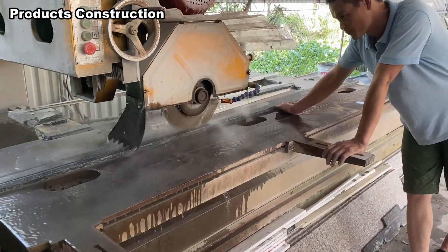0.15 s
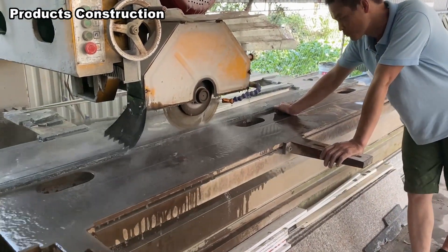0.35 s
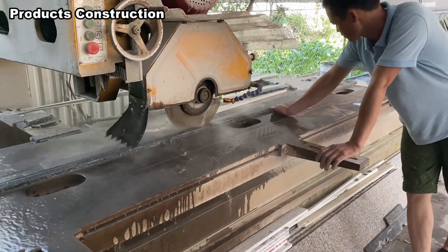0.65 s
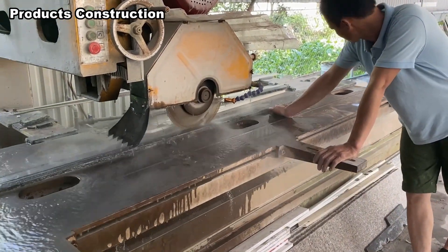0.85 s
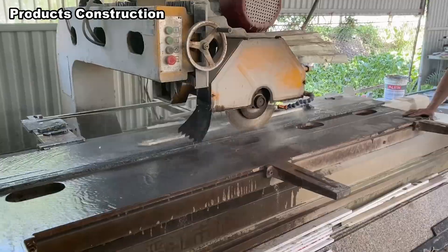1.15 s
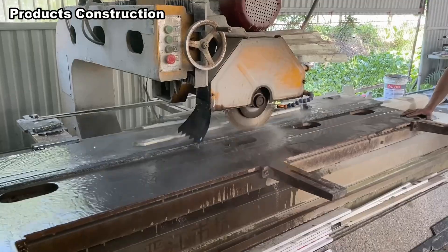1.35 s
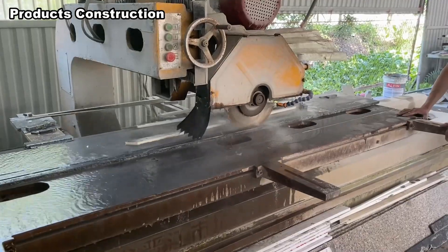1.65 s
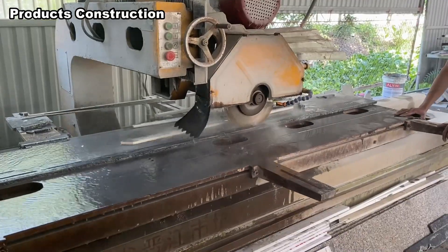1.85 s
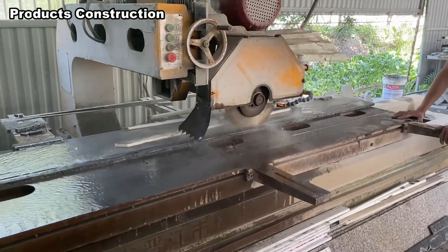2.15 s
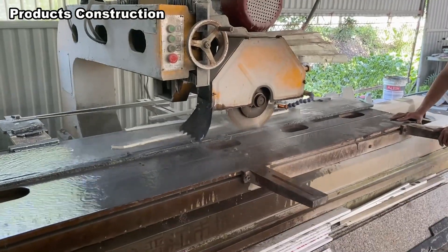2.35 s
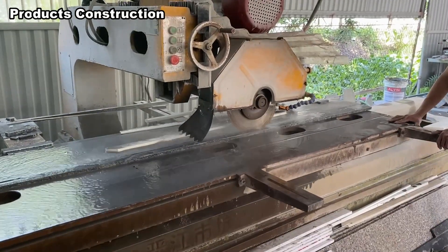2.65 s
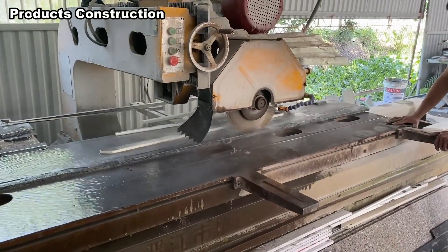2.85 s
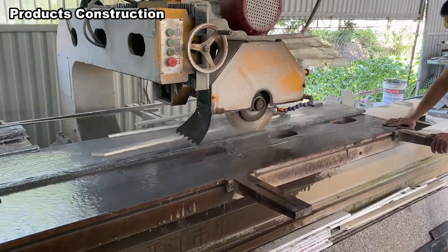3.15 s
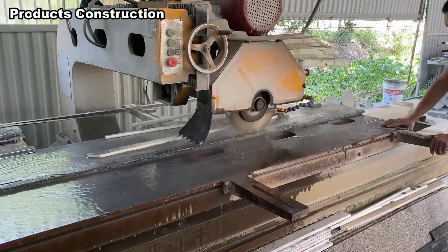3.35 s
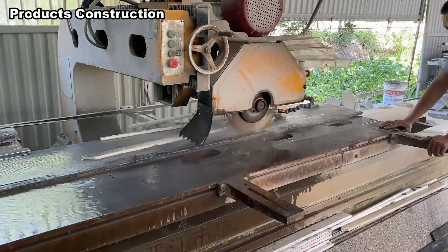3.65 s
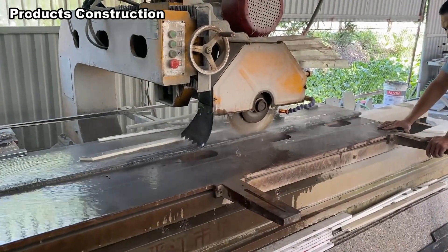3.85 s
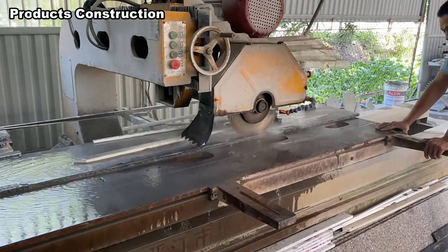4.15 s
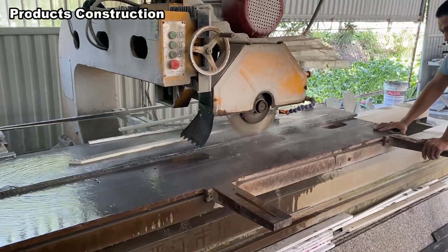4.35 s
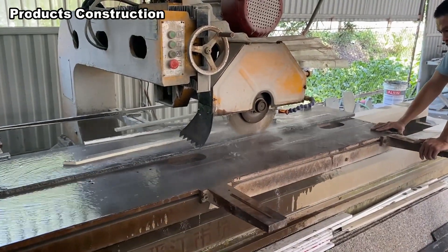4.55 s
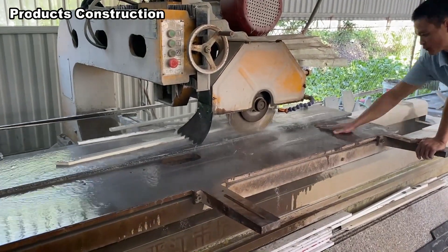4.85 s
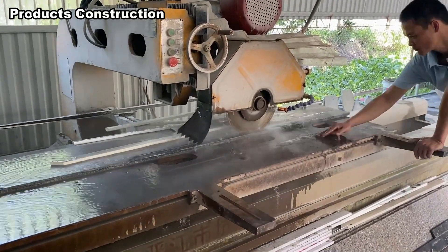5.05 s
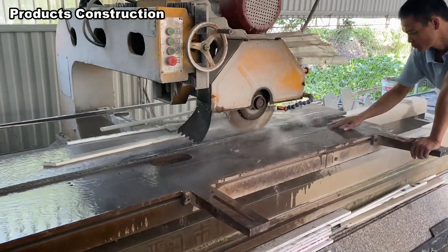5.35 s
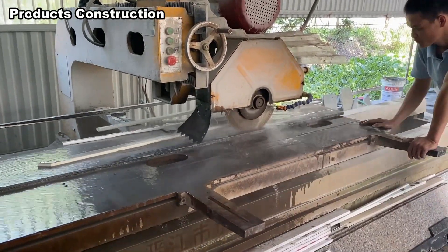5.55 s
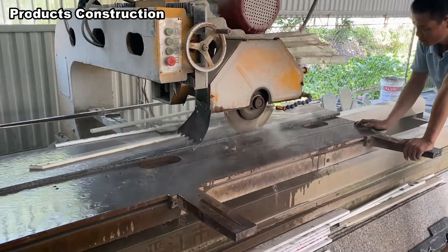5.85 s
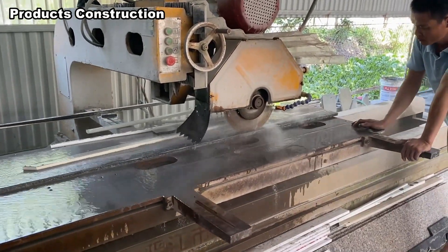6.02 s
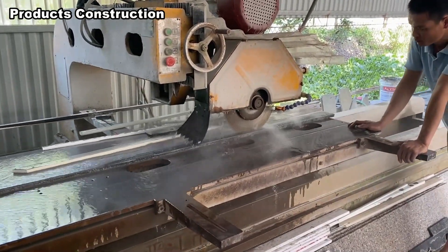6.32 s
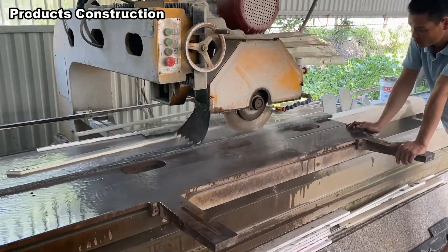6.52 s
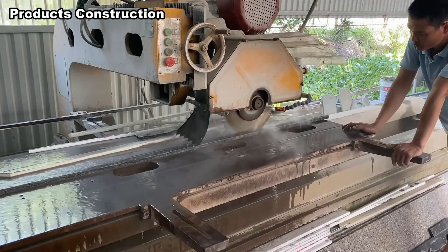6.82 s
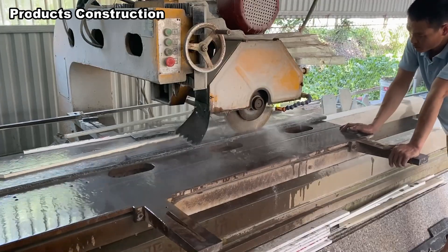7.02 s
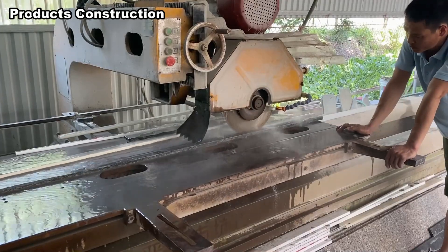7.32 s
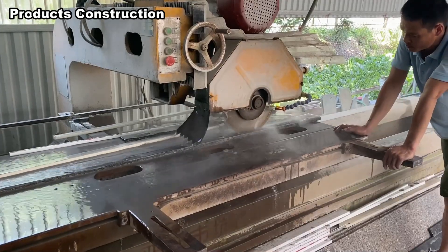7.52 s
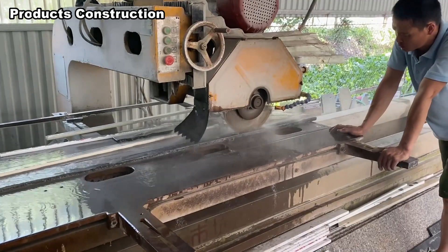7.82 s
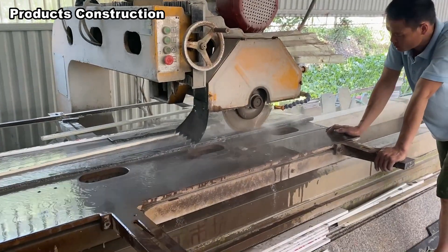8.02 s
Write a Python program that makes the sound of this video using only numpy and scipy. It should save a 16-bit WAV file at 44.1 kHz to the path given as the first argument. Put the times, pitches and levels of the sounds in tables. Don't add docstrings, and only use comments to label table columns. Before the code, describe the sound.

A steady, abrasive roar of wet stone sawing: sizzling water, rasping grit and metallic howl around the upper midrange, with a fine rapid flutter. Clear motor-like whine tones come and go. One closer cut lasts just over a second, a blink of silence follows, then a longer cut from further back, its ringing colour shifting as the slab slides. Captured in stereo in an open workshop.

```python
import sys
import numpy as np
from scipy import signal
from scipy.fft import rfft, irfft, next_fast_len
from scipy.io import wavfile
from scipy.ndimage import uniform_filter1d

SR = 44100
rng = np.random.default_rng(int(sys.argv[2]) if len(sys.argv) > 2 else 0)


def wav_record(signal):
    frames = np.transpose(np.atleast_2d(signal))
    bounded = np.clip(frames, -1, 1)
    quanta = np.round(bounded * 32767).astype(np.int16)
    wavfile.write(sys.argv[1], SR, quanta)


def voltage_ratio(level):
    return 10 ** (np.asarray(level, float) / 20)


N = 360738
T = np.arange(N) / SR
STEP = 40
SLOW_T = T[::STEP]
SECOND = SLOW_T > 1.2

# t/s, loudness level/dB, slowing of the blade/(segments per s)
FEED = [
    (0, -27.5, 7.5),
    (1.19, -28, 9.8),
    (1.21, -29.5, 4.6),
    (1.7, -30, 2.55),
    (2.7, -29, 6.3),
    (3.6, -29.5, 1.214),
    (5.3, -30, 1.936),
    (5.9, -29.5, 5.8),
    (7.0, -29, 6.9),
    (8.18, -28.5, 5.5),
]
STAGE_TIMES = [1.2, 1.201, 2.7, 3.3, 5.5, 6.0]
TABLE_MODES = [(199.5, 165, -73.5, -72, -71.5, -73), (328, 101, -75, -71, -72, -72),
               (458, 123, -68.5, -77.5, -78.5, -73.5), (759, 71, -71, -72.5, -73, -70.5),
               (938, 176, -66.5, -82, -76.5, -80), (1067, 186, -66, -66, -65.5, -65.5),
               (1190, 204, -70, -66, -66, -66), (1362, 132, -65.5, -66, -66, -67),
               (1606, 96, -68, -72.5, -81, -74.5), (1666, 85, -76.5, -89, -71, -75),
               (1836, 198, -71, -69, -69.5, -70), (2120, 215, -68.5, -74.5, -74.5, -72.5),
               (2380, 180, -68.5, -88, -82, -73.5), (2710, 110, -69, -73, -70.5, -77)]
BLADE_MODES = [(3237, 342, -61, -70, -80, -66), (3249, 109, -71, -70, -62, -80),
               (3324, 130, -80, -64, -65, -63), (3532, 262, -64, -66, -66, -63),
               (3777, 139, -61, -68, -72, -80), (3831, 117, -80, -68, -69, -66),
               (4139, 220, -80, -66, -67, -70), (4302, 406, -62, -71, -69, -72),
               (4612, 92, -63, -66, -80, -70), (4764, 129, -67, -64, -70, -69),
               (5029, 307, -67, -67, -70, -67)]
GUARD_MODES = [(5482, 369, -64, -65, -66, -67), (5729, 157, -67, -80, -74, -71),
               (5956, 406, -68, -70, -74, -69), (6441, 316, -65, -66, -66, -67),
               (6802, 340, -64, -65, -66, -65), (7135, 313, -68, -69, -69, -68),
               (7450, 317, -65, -67, -69, -66), (7712, 268, -66, -71, -71, -69),
               (8095, 289, -66, -67, -70, -69)]
RIM_MODES = [(8732, 229, -66, -73, -71, -72), (9360, 312, -67, -74, -72, -75),
             (9948, 268, -65, -69, -69, -69), (10410, 241, -67, -69, -70, -69),
             (10760, 601, -68, -69, -70, -69), (12102, 105, -75, -69, -72, -69),
             (12259, 167, -73, -70, -71, -69), (12330, 768, -72, -71, -71, -70),
             (13058, 312, -73, -76, -77, -78), (14080, 868, -77, -76, -75, -75)]
# f/Hz, pitch wander/Hz, then rms level/dB in the same four stages
HOWLING_MODES = [(207, 27, -62, -53, -53, -54), (325, 18, -60, -53, -58, -55),
                 (1075, 23, -60, -50, -45, -41.5), (1370, 23, -38.5, -45, -42, -53),
                 (3169, 31, -42, -48, -47, -41), (3486, 17, -43, -47, -50, -38.5),
                 (3903, 31, -45, -45, -46, -47), (4397, 26, -41, -47, -51, -52),
                 (4661, 27, -60, -44, -48, -49)]
# f/Hz, level/(dB per Hz) in first cut, level/(dB per Hz) in second cut
SPRAY_COLOUR = [(40, -88, -89), (60, -87, -88), (90, -84, -86), (160, -80, -85), (650, -81, -79),
                (1500, -97, -94), (2500, -71, -76), (3100, -72, -68), (5000, -68, -67), (7000, -70, -73),
                (8500, -73, -73), (11500, -73, -75), (13500, -79, -81), (15000, -78, -80)]
# f/Hz, left over right level/dB
LEAN_NEAR = [(60, -3), (100, 1.5), (180, 2), (310, 7), (550, 4), (950, -1), (1650, 5), (2860, 2), (4970, 4),
             (8640, -1), (15000, -0.5)]
LEAN_FAR = [(60, -4), (95, 7), (150, 13), (240, 2), (380, 2), (600, -0.5), (950, -0.5), (1500, 2.5),
            (2380, 2), (3770, 1.5), (5980, 1.5), (9470, -1.5), (15000, 0)]
# start t/s, end t/s, rms level/dB
SECOND_FLARES = [(.9, 1.1, -45), (2.1, 2.9, -43), (5.4, 8.2, -43.5)]
THIRD_FLARES = [(0, 1.1, -44), (2.8, 3.5, -42), (5.4, 5.8, -44), (6.8, 8.2, -43)]
OVER_2ND_FLARES = [(0, .9, -43), (1.6, 4.7, -42.5), (7.3, 7.4, -54)]
OVER_4TH_FLARES = [(0, .2, -48), (2.3, 2.9, -60), (6.4, 6.899, -43), (7.901, 8.199, -43)]
OVER_5TH_FLARES = [(0, .4, -43), (3.2, 3.7, -38.5), (4.201, 4.399, -49)]


def drift(rate_hz):
    r = np.exp(-2 * np.pi * rate_hz * STEP / SR)
    white = rng.standard_normal(N // STEP + 2001)
    slow = signal.lfilter([1], [1, -2 * r, r * r], white)[2000:]
    return slow / slow.std()


def gain_of(db):
    return np.repeat(voltage_ratio(db), STEP, axis=-1)[..., :N]


def lean_db(hz):
    near_hz, near_db = np.transpose(LEAN_NEAR)
    far_hz, far_db = np.transpose(LEAN_FAR)
    near = np.interp(np.log(hz), np.log(near_hz), near_db)
    far = np.interp(np.log(hz), np.log(far_hz), far_db)
    return np.where(SECOND, far, near) * [[.5], [-.5]]


def stage_db(first, early, midway, late):
    return np.interp(SLOW_T, STAGE_TIMES, [first, early, early, midway, midway, late])


def spray(noise, bite_db, patchy_db):
    size = next_fast_len(N)
    hz = np.maximum(np.arange(size // 2 + 1) * SR / size, 20)
    corners, near_db, far_db = np.transpose(SPRAY_COLOUR)
    far = rfft(noise, size) * voltage_ratio(np.interp(np.log(hz), np.log(corners), far_db))
    out = np.zeros((2, N))
    for centre in 45 * 2. ** np.arange(-1, 9, .5):
        octaves_off = np.log2(hz / centre)
        patch = np.cos(np.pi / 2 * np.clip(2 * octaves_off, -1, 1)) ** 2
        closer_db = np.interp(np.log(centre), np.log(corners), near_db - far_db) * ~SECOND
        db = closer_db + bite_db + patchy_db * drift(21.0) + lean_db(centre)
        out += gain_of(db) * irfft(far * patch, size)[:, :N]
    return out


def resonance(x, hz, width_hz):
    r = np.exp(-np.pi * width_hz / SR)
    stage = [(1 - r * r) / 2, 0, (r * r - 1) / 2, 1, -2 * r * np.cos(2 * np.pi * hz / SR), r * r]
    return signal.sosfilt([stage, stage], x)


def ringing(modes, noise, bite_db, own_db, own_rate):
    out = np.zeros((2, N))
    for k, (hz, width_hz, *stages) in enumerate(modes):
        db = stage_db(*stages) + bite_db + own_db * drift(own_rate) + lean_db(hz)
        out += gain_of(db) * resonance(noise[k % 3], hz, width_hz)
    return out


def howl(bite_db, waver_db, wander_rate):
    out = np.zeros((2, N))
    for hz, wander_hz, *stages in HOWLING_MODES:
        waver = waver_db * hz / 1000 * np.array([drift(5.6), drift(2.2)])
        db = stage_db(*stages) + bite_db + waver + lean_db(hz)
        wander = np.repeat([drift(wander_rate), drift(wander_rate)], STEP, axis=1)[:, :N]
        phase = 2 * np.pi * np.cumsum(hz + wander_hz * wander, axis=1) / SR
        out += np.sqrt(2) * gain_of(db) * np.sin(phase)
    return out


def flares_db(flares):
    levels = []
    for start, end, db in flares:
        seconds_away = np.maximum(np.maximum(start - T, T - end), 0)
        levels.append(db - 22 * seconds_away)
    return np.max(levels, axis=0)


def whine(segment, wobble):
    second, third = flares_db(SECOND_FLARES), flares_db(THIRD_FLARES)
    over_2nd = flares_db(OVER_2ND_FLARES)
    over_4th, over_5th = flares_db(OVER_4TH_FLARES), flares_db(OVER_5TH_FLARES)
    tones = [(segment, second - 16), (2 * segment, second), (3 * segment, third),
             (segment + wobble, over_2nd - 16), (2 * segment + wobble, over_2nd),
             (3 * segment + wobble, -54), (4 * segment + wobble, over_4th),
             (5 * segment + wobble, over_5th)]
    out = np.zeros((2, N))
    for phase, db in tones:
        ear_db = np.array([drift(9.9), drift(1.0)]) + [[0], [-5.5]]
        waver = gain_of(1.5 * ear_db)
        slip = 1.8 * np.interp(np.arange(N) / STEP, np.arange(N // STEP + 1), drift(1.3))
        out += np.sqrt(2) * voltage_ratio(db) * waver * np.sin([phase, phase + slip])
    return out


def blade_turns(slowed):
    segments_per_s = 1485 - slowed
    segment = 2 * np.pi * np.cumsum(segments_per_s) / SR
    return segment, .0543 * segment


def grit(segment, chop):
    cracks = np.sqrt(SR / 2) * rng.standard_normal((4, 2, N))
    return cracks * (1 + chop * np.cos(segment))


def scene():
    feed_t, feed_levels, feed_slowing = np.transpose(FEED)
    segment, wobble = blade_turns(np.interp(T, feed_t, feed_slowing))
    noise = grit(segment, chop=0.36)
    flutter_db = 0.5 * drift(13.0) + 0.5 * drift(37.0)
    flutter_db -= uniform_filter1d(flutter_db, size=SR // 240)
    throb = np.cos(wobble[::STEP])
    bite_db = flutter_db + 0.49 * throb
    table_db = .5 * flutter_db + 0.4 * throb

    grind = spray(noise[3], bite_db, patchy_db=-0.2)
    grind += ringing(TABLE_MODES, noise, table_db, own_db=0.35, own_rate=0.74)
    grind += howl(table_db, waver_db=.5, wander_rate=16.0)
    grind += ringing(BLADE_MODES + GUARD_MODES + RIM_MODES, noise, bite_db, own_db=1.6, own_rate=15.0)

    power = uniform_filter1d(np.mean(grind ** 2, axis=0), size=SR // 3)
    feed_db = np.interp(T, feed_t, feed_levels)
    return grind / np.sqrt(power) * voltage_ratio(feed_db + 3.0) + whine(segment, wobble)


def band_limit(x):
    return signal.sosfilt(signal.butter(12, 16870, fs=SR, output="sos"), x)


def record(dry):
    fade_out = 1 - (T - 1.1875) / .0075
    fade_in = (T - 1.2135) / .004
    join = np.clip(np.maximum(fade_out, fade_in), 0, 1)
    top_cut = signal.ellip(14, .3, 70, 15730, fs=SR, output="sos")
    mix = signal.sosfilt(top_cut, dry * join)
    return band_limit(mix)


dry = scene()
out = record(dry)
wav_record(out)
```